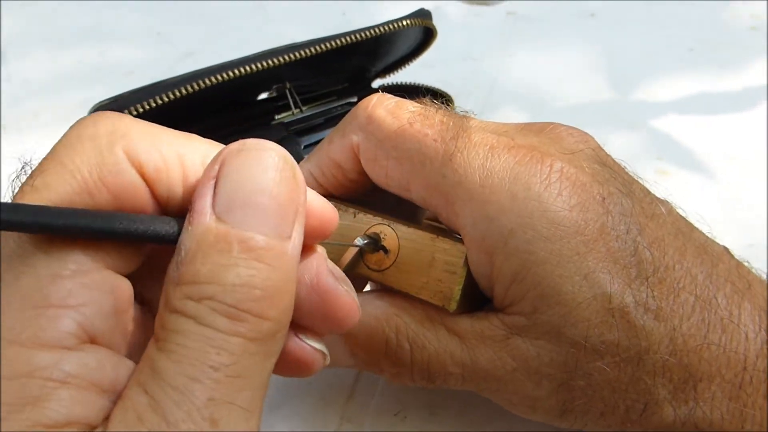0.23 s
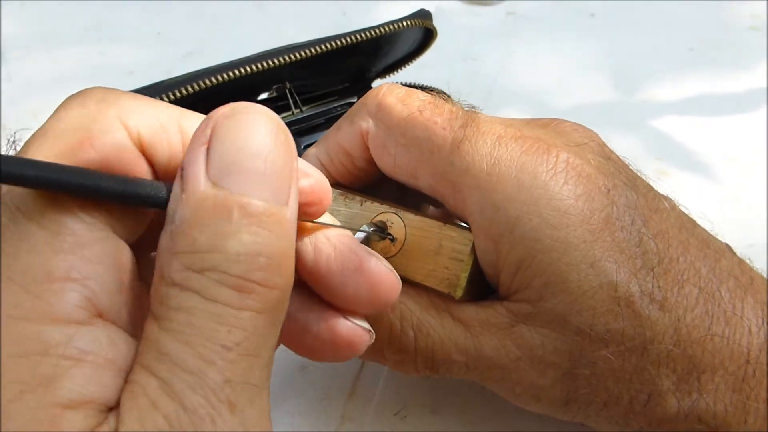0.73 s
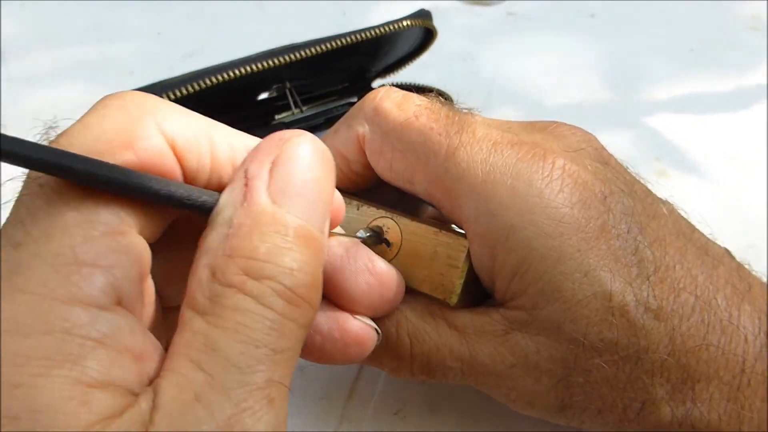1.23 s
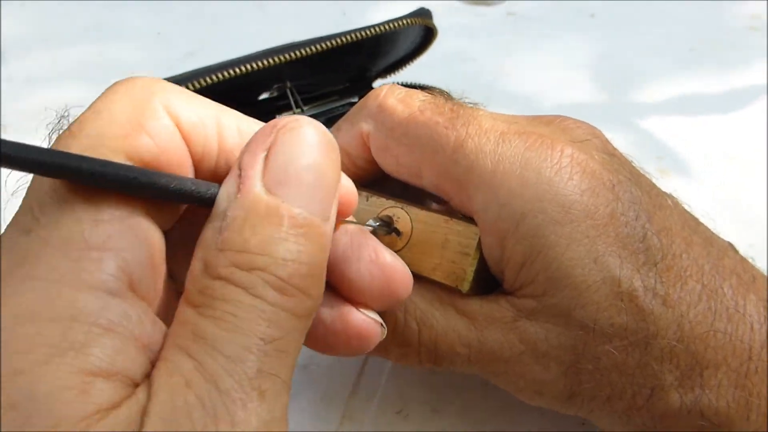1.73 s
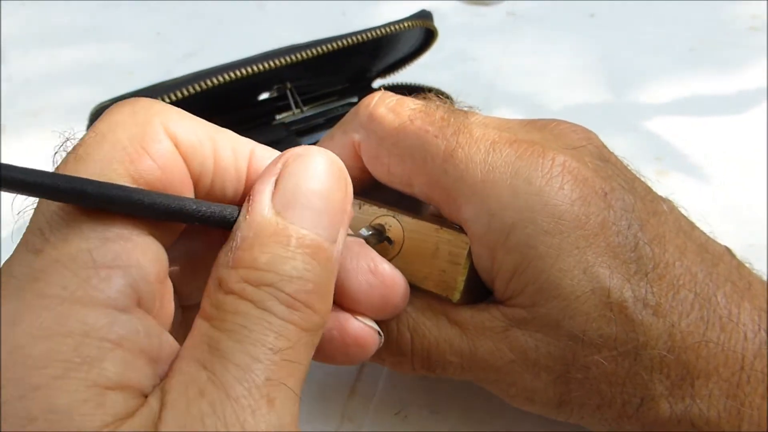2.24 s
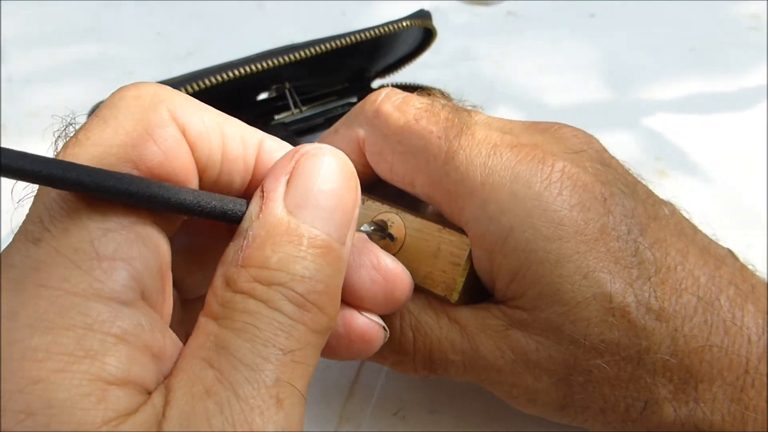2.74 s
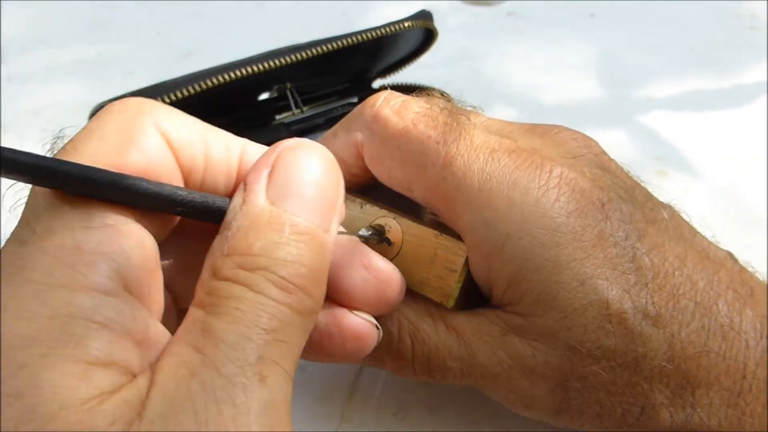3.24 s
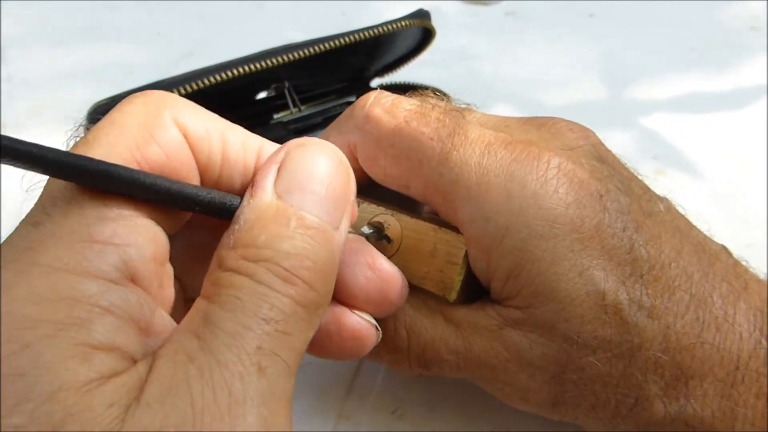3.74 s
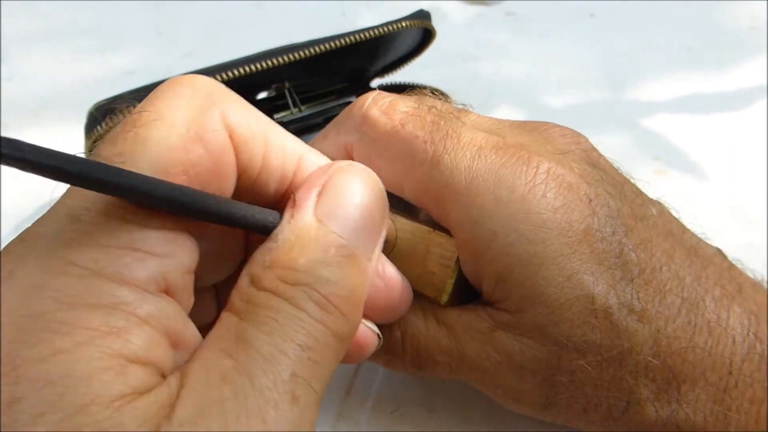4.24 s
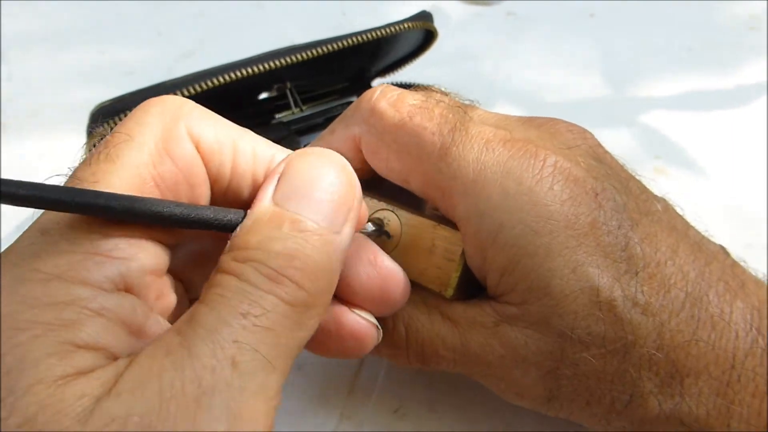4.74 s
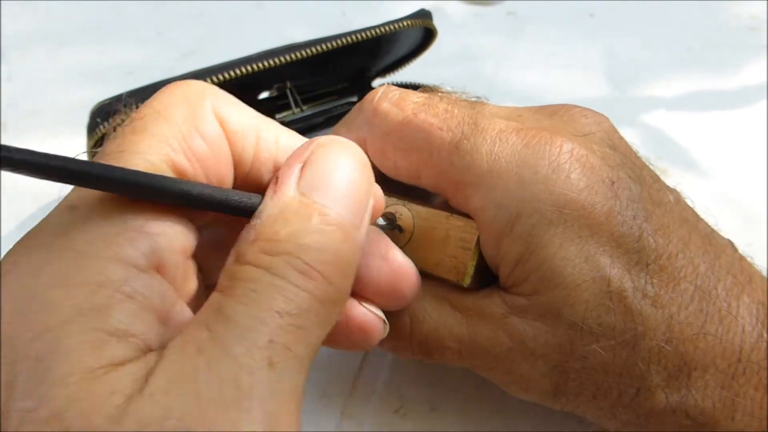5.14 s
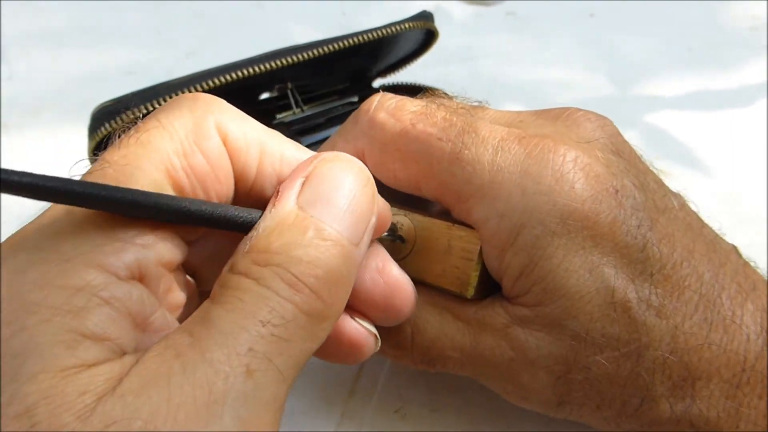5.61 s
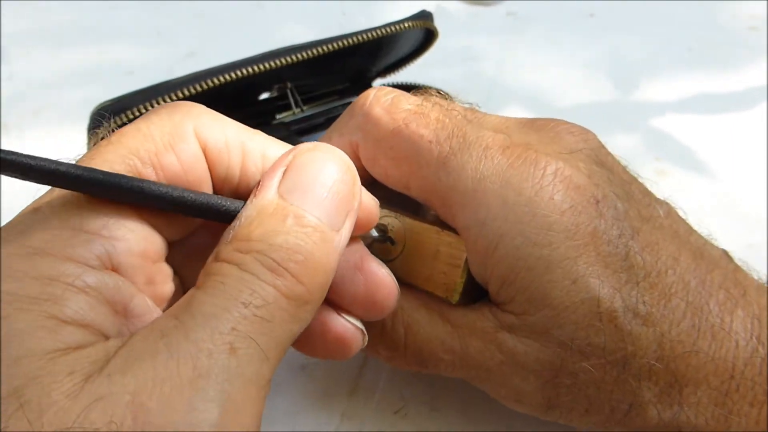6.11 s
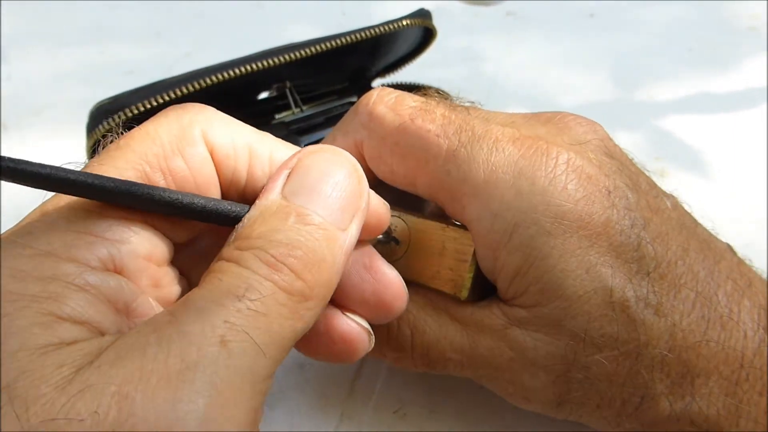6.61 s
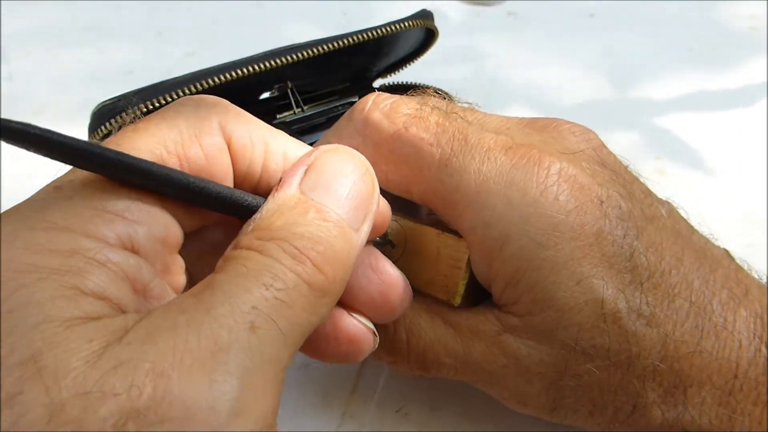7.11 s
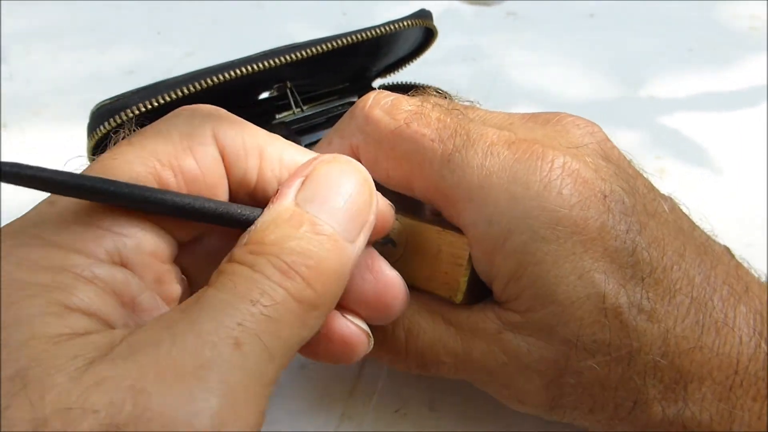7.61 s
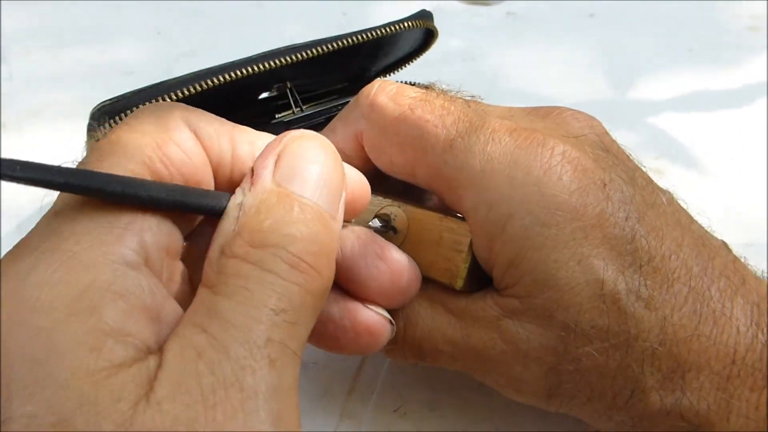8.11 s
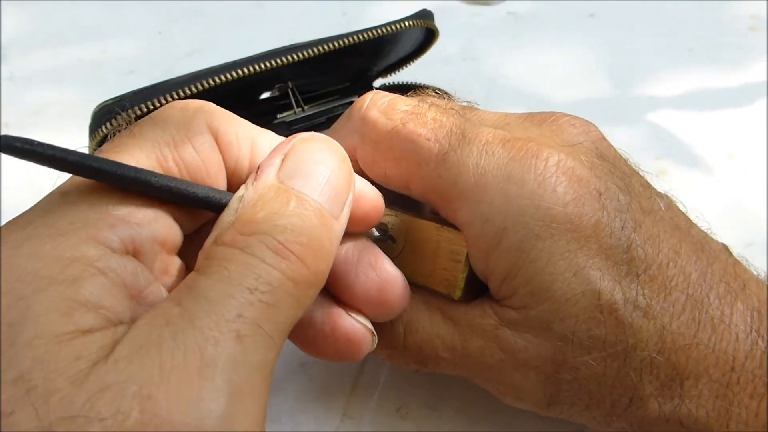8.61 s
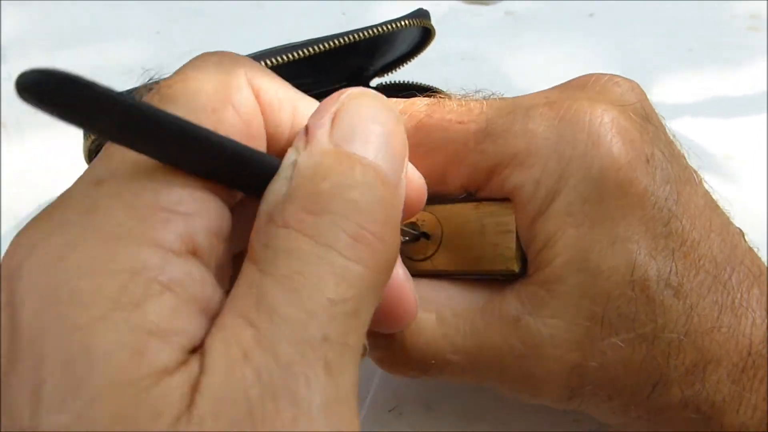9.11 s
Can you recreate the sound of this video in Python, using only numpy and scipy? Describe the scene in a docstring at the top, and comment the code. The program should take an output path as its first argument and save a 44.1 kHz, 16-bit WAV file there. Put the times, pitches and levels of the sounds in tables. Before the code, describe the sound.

Dry, close stereo sound of lock picking: sharp little metal clicks cluster at the start, then become scattered among faint gritty drags. From two seconds pins spring back with cracks, the sharpest at four and a half. Soft hand knocks on a table grow more frequent after five seconds. Near the end the plug turns with a lower rasp and one heavy bump. Steady rumble, hiss, light skin rustle and a thin, slowly growing sizzle lie behind.

```python
"""A steel pick and a tension wrench work the pins of a brass padlock, heard close, for 9.35 s.
Throughout: filtered-noise rumble (swelling to 1.42 s), microphone hiss, a growing sizzle, rustling skin.
From 0.06 s the pick ticks (coloured bursts) and drags; from 0.54 s the lock slips (grains through modes).
From 2.0 s sprung pins snap back (crack, steel ring, body modes) and hands bump the table (damped modes).
Skin slides on the handle about 8.1 s; the plug turns from 8.9 s, lowering the rasp; last bump 9.09 s."""
import sys
import numpy as np
from scipy import signal
from scipy.fft import rfft, irfft, next_fast_len
from scipy.io import wavfile
from scipy.ndimage import uniform_filter1d, map_coordinates

SR = 44100
rng = np.random.default_rng(int(sys.argv[2]) if len(sys.argv) > 2 else 0)


def log_audio(samples):
    """Write samples as a 16-bit WAV file to the path given in sys.argv[1]."""
    # one column per channel
    frames = np.atleast_2d(samples).T
    # limit to full scale, then quantise
    limited = np.clip(frames, -1, 1)
    pcm = np.round(limited * 32767).astype(np.int16)
    wavfile.write(sys.argv[1], SR, pcm)


N = 412335
HIT_S = np.arange(8192) / SR  # time base of one short sound
HIT_HZ = np.fft.rfftfreq(len(HIT_S), 1 / SR)

# firm pick contacts: t/s, level/dB, brightness/(dB/octave), resonance f/Hz, resonance/dB,
# relative thud energy/dB
CLICKS = [(.0559, -9, 4, 7970, 13.5, -16), (.061, -25.5, -3.5, 5060, 20.5, -19),
          (.0945, -1, 0.5, 7850, 6, -10.5), (.1176, -22, 0, 7400, 14, -40),
          (.43, -9.5, 3, 7160, 17.5, -13.5), (.4586, -2.5, 4.5, 8000, 20, -19),
          (.5253, -15, -6, 4000, 6, -16), (.5565, -13.5, -2.5, 7740, 12, -26),
          (.7364, -25.5, -7.5, 4580, 1, -19), (1.2937, -15, -4.5, 7200, -5, -13.5),
          (1.2986, -10, 5.5, 8600, 2, -18), (1.3568, -8, 2.5, 11340, 14.5, -32),
          (1.688, -25, -5.5, 4400, 8, -17), (1.7038, 1, 6.5, 10850, 4, -2),
          (1.7467, -23, -0.5, 5400, 8, -38), (1.9515, -22, 0.5, 7200, 2, -17.5),
          (2.067, -15, 3.5, 5240, 11, -20), (2.464, -3.5, 2, 11200, 4, -14.5),
          (2.4684, -7.5, 3, 11400, 6, -49), (2.4725, -13, 2, 6900, 14, -16.5),
          (2.5417, -22, -3.5, 5300, 3, -42), (2.74, -13.5, 1, 10740, 3, -19.5),
          (2.7753, -23, .5, 8000, 6, -20), (3.0072, -29.5, -6, 5800, 6, -22),
          (3.071, -31, -2.5, 6800, 12, -39), (3.5034, -18, 0.5, 11400, 4, -26),
          (3.8865, -2.5, 2.5, 7150, 5, -22), (4.142, -17, 2, 9800, 6, -21),
          (4.152, -14.5, 0, 10300, 9, -25), (4.5202, -6, 1.5, 11000, 12, -14),
          (4.692, -13, .5, 10400, 14, -17), (4.8315, -28, 2.5, 11200, 8, -22),
          (4.9396, -10.5, 3, 11000, 3, -25), (5.176, -13.5, 5, 10700, 10.5, -20.5),
          (5.3446, -21.5, -3.5, 7300, 11, -22), (5.5866, -23.5, -4, 6000, 17, -18.5),
          (6.1979, -2, 2, 10600, 10, -44), (6.398, -33, -10.5, 6930, -2, -22),
          (7.1013, -13.5, 1.5, 10000, 11, -18.5), (7.5024, -23.5, 4, 7600, 13, -19),
          (7.5258, -9.5, 5, 5600, 3, -26), (7.8176, -26.5, 0, 11600, 7, -23),
          (7.8644, -12, 0, 10350, 11, -44), (7.9079, -14.5, -2, 6170, 17, -22),
          (7.9616, -19, 2.5, 7400, 4, -37), (8.3368, -11.5, 0, 14400, 1, -29),
          (8.515, -22.5, -0.5, 9600, 12.5, -42), (8.6136, -9.5, 2.5, 10300, 7, -24),
          (8.9433, -14, .5, 6500, 6, -15.5), (9.2088, -11.5, 3, 6600, 23, -40)]
# padlock modes in the grip: f/Hz, relative level/dB, t60/s
LOCK_MODES = [(197, -13.5, 0.13), (334.3, 4.5, 0.094), (397, 4.5, 0.038), (687, -1.5, 0.04),
              (1172, -1, 0.064), (2037, -2.5, 0.045), (2250, -9, 0.051)]


def amp(db):
    """Decibels to gain."""
    return 10 ** (np.asarray(db) / 20)


def unit(x):
    """Scale to rms 1."""
    return x / np.sqrt(np.mean(x ** 2) + 1e-20)


def unit_energy(x):
    """Scale to energy 1."""
    return x / (np.linalg.norm(x) + 1e-20)


def decay(t60_s):
    """Exponential decay, 60 dB down after t60_s."""
    return amp(-60 * HIT_S / t60_s)


def onset(rise_s):
    """Exponential rise with time constant rise_s."""
    return 1 - np.exp(-HIT_S / rise_s)


def along(points, hz):
    """(Hz, value) points interpolated on a log frequency axis."""
    f, v = np.transpose(points)
    return np.interp(np.log(hz + 1), np.log(f + 1), v)


def wobble(knots_per_s):
    """Smooth random curve: spline through normal random knots."""
    knots = rng.standard_normal(int(N * knots_per_s / SR) + 4)
    return map_coordinates(knots, [np.arange(N) * knots_per_s / SR])


def swell(peak_s, rise_s, fall_s, height_db):
    """One linear rise and fall in dB, a value per sample."""
    return height_db * np.interp(np.arange(N) / SR - peak_s, [-rise_s, 0, fall_s], [0, 1, 0])


def add(track, s, x):
    """Mix a short sound in at time s, faded to silence before its end."""
    i = max(0, round(s * SR))
    fade = np.clip(2 - 2.5 * np.arange(len(x)) / len(x), 0, 1)
    track[i:i + len(x)] += (fade * x)[:max(0, N - i)]


def filtered(x, response):
    """Whole track times a response of frequency."""
    m = next_fast_len(N + SR // 2)
    return irfft(rfft(x, m) * response(np.fft.rfftfreq(m, 1 / SR)), m)[..., :N]


def coloured(x, gain):
    """Short sound through the causal minimum-phase filter with this gain."""
    cepstrum = irfft(np.log(np.maximum(gain, 1e-6)))
    cepstrum[1:len(x) // 2] *= 2
    cepstrum[len(x) // 2 + 1:] = 0
    return irfft(rfft(x) * np.exp(rfft(cepstrum)))


def no_bass(x, low_hz=120):
    """Small things radiate almost nothing below this frequency."""
    return signal.lfilter(*signal.butter(5, low_hz, "high", fs=SR), x)


def burst(t60_s, tail_db, tail_t60_s):
    """Noise spike and a decaying tail, ragged but broadly white."""
    shape = (decay(t60_s) + amp(tail_db) * decay(tail_t60_s)) * onset(.0001)
    z = rfft(shape * rng.standard_normal(len(HIT_S)))
    smooth_power = uniform_filter1d(np.abs(z) ** 2, size=450)
    return irfft(z / np.sqrt(np.abs(smooth_power) + 1e-12))


def ring(modes, phase=0):
    """Sum of damped modes, struck at slightly new strengths each time."""
    hz, db, t60_s = np.transpose(modes)[:, :, None]
    db = db + 1.2 * rng.standard_normal(db.shape)
    return np.sum(amp(db) * decay(t60_s) * np.cos(2 * np.pi * hz * HIT_S + phase), axis=0)


def rush(spectrum):
    """Coloured stereo noise of rms 1; mid/side balance sets the left-right correlation."""
    # left-right likeness of the background: f/Hz, correlation (0-1)
    likeness = [(60, 0.63), (130, 0.95), (290, 0.92), (640, 0.54), (1410, 0), (3100, 0), (6820, 0.6),
                (15000, 0.54)]

    def mid_side_gain(hz):
        angle = np.arccos(np.clip(along(likeness, hz), -1, 1)) / 2
        return amp(along(spectrum, hz)) * np.array([np.cos(angle), np.sin(angle)])

    mid, side = filtered(rng.standard_normal((2, N)), mid_side_gain)
    return unit(np.array([mid + side, mid - side]))


def background():
    """Room rumble, microphone hiss, a growing sizzle, and skin rubbing in short uneven pushes."""
    # noise colours: f/Hz, relative level/(dB per Hz)
    rumble_colour = [(20, -36), (60, -14), (85, -15), (135, -4.5), (300, 2), (450, -1), (600, 2.5),
                     (800, -1), (1000, 1), (1300, -4), (1700, -15), (3000, -26.5), (8000, -33)]
    hiss_colour = [(300, -6), (1600, 0.5), (2550, 2.5), (2900, -3), (3700, -2), (4400, 4), (5300, -3),
                   (8400, -2.5), (8850, -7.5), (9100, -15), (9800, -2.5), (12000, -8), (15000, -11.5),
                   (15900, -32)]
    skin_colour = [(30, -26), (80, -47), (140, -2.5), (250, -1.5), (390, -1), (500, -6), (1200, -32),
                   (4000, -29)]
    slide_colour = [(1000, -25), (2000, -5), (2900, 5), (3400, -9), (4050, 12.5), (5000, -1), (7000, 3),
                    (9100, -10), (10300, 3), (14000, -9), (16000, -25)]
    sizzle_colour = [(3300, -60), (3950, -6), (4230, -4.5), (4450, -8), (4750, -10.0), (5200, -14), (6500, -56)]
    # one swell of the rumble; one slide of skin along the handle: peak t/s, rise/s, fall/s, height/dB
    rumble_swell = (1.42, 1.7, 0.37, 3.8)
    skin_slide = (8.1, 0.28, 0.8, 24)

    rumble = amp(-54.5 + swell(*rumble_swell) + 0.34 * wobble(7)) * rush(rumble_colour)
    hiss = amp(-59) * rush(hiss_colour)
    growth_db = 1.0 * np.arange(N) / SR  # 1 dB per second
    sizzle = amp(-74.5 + growth_db + wobble(18)) * rush(sizzle_colour)
    skin = amp(-62 + 4.3 * wobble(25)) * rush(skin_colour)
    slide = amp(-80 + swell(*skin_slide) + 1.6 * wobble(40)) * rush(slide_colour)
    return rumble + hiss + sizzle + skin + slide


def room(x):
    """Brief diffuse answer from nearby surfaces: decaying noise, different at each ear."""
    # room decay: f/Hz, t60/s
    room_t60 = [(200, 0.016), (1500, 0.13), (6000, 0.1), (14000, 0.055)]
    hz, t, z = signal.stft(rng.standard_normal((2, SR // 4)), SR, nperseg=256)
    tail = signal.istft(z * amp(-60 * t / along(room_t60, hz)[:, None]), SR, nperseg=256)[1]
    late = np.pad(x, (round(.002 * SR), 0))
    return signal.fftconvolve(late[None], tail / np.linalg.norm(tail[0]), axes=1)[:, :N]


def thud(cut_hz, dull_hz=900):
    """The table's modes under a blow; a softer contact leaves out the upper ones."""
    # table modes: f/Hz, relative level/dB, t60/s
    table_modes = [(145, -21, 0.34), (189, -14.5, 0.087), (267.6, -8.5, 0.036), (368, 1, 0.045),
                   (533, -23.5, 0.033), (651, -14.5, 0.044), (809, -14, 0.045), (947, -10, 0.02),
                   (1128, -9.5, 0.028), (1770, -9, 0.0069)]
    # returns from the table's edges and a wall: delay/s, gain
    returns = [(.0034, 0.46), (.0059, -0.55), (0.0248, .22)]
    soft = signal.butter(2, min(cut_hz, SR / 4), fs=SR)
    blow = no_bass(signal.lfilter(*soft, ring(table_modes)))
    dull = signal.lfilter(*signal.butter(1, dull_hz, fs=SR), blow)
    echoes = sum(gain * np.interp(HIT_S - delay_s, HIT_S, dull, left=0) for delay_s, gain in returns)
    return -unit_energy(blow + echoes)


def bumps(edge_db=-18):
    """Hands nudge the table: a thud plus a slight noise edge, brighter for harder blows."""
    # firm bumps: t/s, level/dB, hardness as cut-off f/Hz
    blows = [(2.113, -17, 450), (5.366, -14.5, 450), (5.43, -6, 557), (5.71, -19, 450), (6.047, -7.5, 517),
             (6.108, -15.5, 600), (6.2296, -1.5, 570), (6.9131, 2.5, 940), (7.787, -16, 450),
             (7.9104, -1, 580), (7.95, -14, 500), (8.2219, -7.5, 554), (8.9724, -10.5, 663),
             (9.085, 8.5, 1130)]
    out = np.zeros(N)
    for s, db, hard_hz in blows:
        noise = burst(t60_s=0.0036, tail_db=0, tail_t60_s=0.014)
        edge = coloured(noise, hard_hz / np.hypot(HIT_HZ, hard_hz))
        add(out, s, amp(db) * (thud(hard_hz) + amp(edge_db) * no_bass(edge)))
    return out


def creeps(count=20, body_db=-28.5, grit_db=-36.5):
    """Tiny slips at an uneven pace, one per equal span: t/s, body energy/dB, grit energy/dB."""
    times_s = (np.arange(count) + rng.random(count)) / count * N / SR
    return [(s, body_db, grit_db) for s in times_s]


def shifts(rise_s=0.0032, t60_s=0.032, octaves=0.51):
    """The lock slips in the fingers: noise grains shake its modes and rasp in the keyway."""
    # slips while the pick drags: t/s, body energy/dB, grit energy/dB
    slips = [(.538, -15.5, -28), (.710, -18.5, -31), (.841, -23, -31), (1.470, -19.5, -29),
             (2.222, -20.5, -38), (2.379, -26, -34), (2.548, -26, -40), (2.596, -20.5, -34),
             (3.379, -22, -19), (3.400, -29, -20.5), (4.133, -14.5, -20.5), (4.158, -14, -20.5),
             (4.71, -19, -44), (4.788, -20, -27.5), (5.145, -20, -28), (5.285, -22, -33),
             (5.63, -21.5, -32), (5.992, -17, -30), (6.092, -18, -30), (6.64, -21.5, -39),
             (7.107, -21, -36), (7.596, -22.5, -30), (7.931, -17, -24), (8.069, -30, -29),
             (8.327, -19, -42), (8.631, -15.5, -33), (8.958, -11.5, -18), (9.107, -22, -17),
             (9.262, -20, -17), (9.287, -17, -18.5)]
    turn_s, grit_hz, turning_grit_hz = 8.9, 2070, 1060  # rasp drops once the plug starts to turn
    out = np.zeros(N)
    stroke = onset(rise_s) * decay(t60_s)
    damped = signal.butter(2, 650, fs=SR)  # fingertips pass on only the low modes
    for s, body_db, grit_db in list(slips) + creeps():
        hz = grit_hz if s < turn_s else turning_grit_hz
        grains = stroke * rng.standard_normal(len(HIT_S)) * rng.exponential(size=len(HIT_S))
        shaken = signal.fftconvolve(grains, ring(LOCK_MODES))[:len(HIT_S)]
        body = signal.lfilter(*damped, shaken)
        grit = coloured(grains, 1 / (1 + (np.log2((HIT_HZ + 1) / hz) / octaves) ** 2))
        add(out, s, amp(body_db) * unit_energy(body) + amp(grit_db) * unit_energy(grit))
    return out


def scrape(count=16, level_db=-37, spread_db=3):
    """At random moments the pick drags faintly over the wards: short band-limited noise."""
    out = np.zeros(N)
    stroke = onset(.003) * decay(.03)
    for when, size, tone in rng.random((count, 3)):
        colour = 1 / (1 + (2 * np.log2((HIT_HZ + 1) / 2200) - tone) ** 4)
        rasp = unit_energy(coloured(stroke * rng.standard_normal(len(HIT_S)), colour))
        add(out, when * N / SR, amp(level_db + spread_db * (2 * size - 1)) * rasp)
    return out


def gripped(modes, detune=0.027):
    """Mode frequencies shifted at random, as the fingers load them; detune is the rms share."""
    return [(hz * (1 + detune * rng.standard_normal()), db, t60_s) for hz, db, t60_s in modes]


def pins(steel_db=-21):
    """A freed pin is shot home by its spring: a crack, a thin ring and a jolt of the lock."""
    # snaps: t/s, crack energy/dB, relative ring/dB, lock body energy/dB
    snaps = [(2.0443, -20.5, -41, -10.5), (3.376, -18, -23, -12.5), (3.6658, -15, -19, -13.5),
             (4.5034, -2, -3.5, -7), (5.966, -12.5, -17.5, -17.5), (6.9699, -9.5, -16, -16),
             (7.3057, -14, -21.5, -21), (9.2084, -22, -11.5, -9.5), (9.295, -20.5, -23, -13)]
    # colour of the crack: f/Hz, gain/dB
    crack_colour = [(60, -69), (400, -2), (1200, -17.5), (2200, -9), (3400, 0.5), (4800, -1.5),
                    (6500, -2.5), (10000, 0), (11200, -13.5), (15000, -21)]
    # steel modes: f/Hz, relative level/dB, t60/s
    steel_modes = [(1977, -5, 0.047), (3330, -3.5, 0.027), (3930, -11.5, 0.046), (5500, -38, .03),
                   (8339, -9, 0.11), (8520, -4.5, 0.12), (9300, -5, 0.055), (9920, 5, 0.023),
                   (11320, -23, .05)]
    out = np.zeros(N)
    for s, crack_db, ring_db, body_db in snaps:
        noise = burst(t60_s=0.012, tail_db=-12.5, tail_t60_s=0.029)
        crack = unit_energy(coloured(noise, amp(along(crack_colour, HIT_HZ))))
        steel = ring(steel_modes) * onset(0.0012)
        body = unit_energy(ring(gripped(LOCK_MODES), phase=-np.pi / 2) * onset(0.0013))
        add(out, s, amp(crack_db) * crack + amp(ring_db + steel_db) * steel + amp(body_db) * body)
    return out


def sideways(x, lead_rad=1.0, centre_hz=1800, pan_db=-1):
    """Uneven radiation of the lock: its middle range leads in phase at left, slightly louder at right."""
    sides = np.array([[.5], [-.5]])

    def lead(hz):
        return lead_rad / (1 + np.log2((hz + 1) / centre_hz) ** 4)

    return filtered(x, lambda hz: np.exp(1j * sides * lead(hz))) * amp(sides * pan_db)


def contact():
    """Hard metal contact: a spike about a millisecond long, then brief chatter."""
    return burst(t60_s=.0011, tail_db=-17, tail_t60_s=.011)


def push(hz=720, t60_s=0.0037):
    """Short hollow knock of the lock against the palm: one damped sine."""
    return unit_energy(no_bass(np.sin(2 * np.pi * hz * HIT_S) * decay(t60_s)))


def touches(count=22):
    """Light rebounds of the springy pick after some firm contacts, with the columns of CLICKS."""
    min_delay_s, max_delay_s = 0.0028, .016
    low_hz, high_hz = 4500, 9500  # range of contact resonance
    level_db, spread_db, slope_db, resonance_db, thud_db = -28.5, 1, -1.5, 13, -36
    rows = []
    for which, delay, size, place in rng.random((count, 4)):
        firm_s = CLICKS[int(which * len(CLICKS))][0]
        s = firm_s + min_delay_s + delay * (max_delay_s - min_delay_s)
        hz = low_hz + place * (high_hz - low_hz)
        db = level_db + spread_db * (2 * size - 1)
        rows.append((s, db, slope_db, hz, resonance_db, thud_db))
    return rows


def pick(width_hz=600, low_hz=1850, thud_db=-3, push_db=-3, blade_db=-14):
    """Each contact is damped at once; where the pick touches sets its resonance."""
    # short ring of the blade: f/Hz, relative level/dB, t60/s
    blade_modes = [(2090, -10.5, 0.039), (2563, 1, 0.038), (3500, 9, 0.012), (4225, -1, 0.043),
                   (5030, 2.5, 0.028)]
    out = np.zeros(N)
    # small parts radiate little bass; the low part of a click comes through the hands
    radiation = 1 / np.sqrt(1 + (low_hz / (HIT_HZ + 300)) ** 10)
    for s, db, slope_db, hz, peak_db, body_db in list(CLICKS) + touches():
        tilt = amp(slope_db * np.log2(np.maximum(HIT_HZ, 2000) / 8000))
        hump = np.sqrt(1 + amp(peak_db) ** 2 / (1 + ((HIT_HZ - hz) / width_hz) ** 2) ** 2)
        strike = contact() + amp(blade_db) * unit_energy(ring(blade_modes))
        add(out, s, amp(db) * coloured(strike, tilt * hump * radiation))
        through_hands = amp(thud_db) * thud(cut_hz=2540) + amp(push_db) * push()
        add(out, s, amp(body_db) * through_hands)
    return out


def scene():
    """Pick and table sit in the middle, the lock near it, all close, over the stereo background."""
    ticks = pick() + scrape()
    lock = no_bass(pins() + shifts())
    table = bumps()
    reflected = room(amp(-14.5) * (ticks + lock) + amp(-26) * table)
    return ticks + sideways(lock) + table + reflected + background()


def record(dry):
    """Treble rolls off from 14.8 kHz and stops at 16.5 kHz."""
    return filtered(dry, lambda hz: amp(along([(14800, 0), (16400, -22)], hz)) * (hz < 16500))


dry = scene()
out = record(dry)
log_audio(out)
```